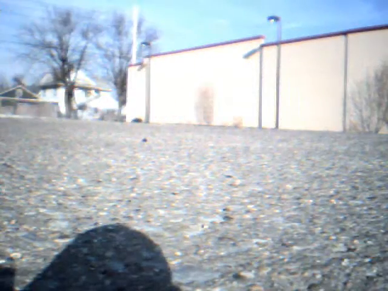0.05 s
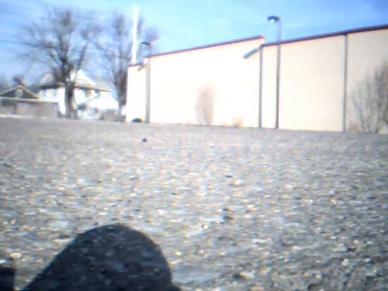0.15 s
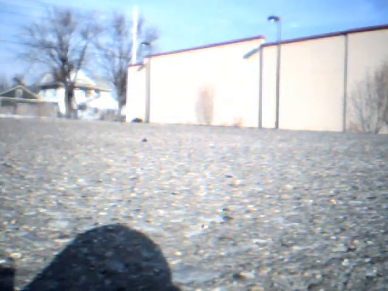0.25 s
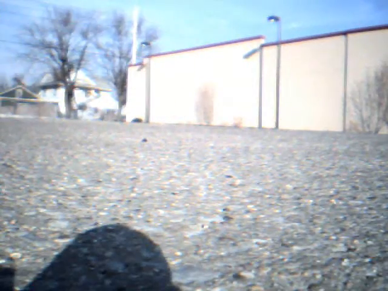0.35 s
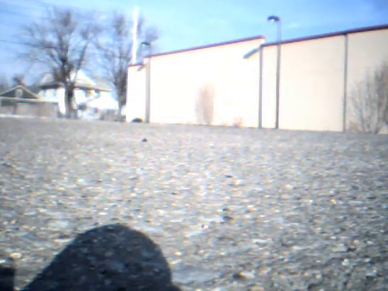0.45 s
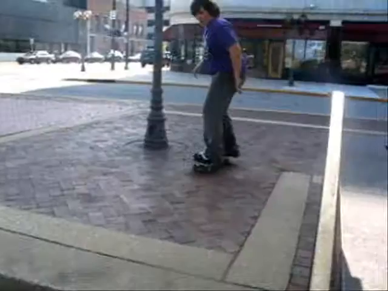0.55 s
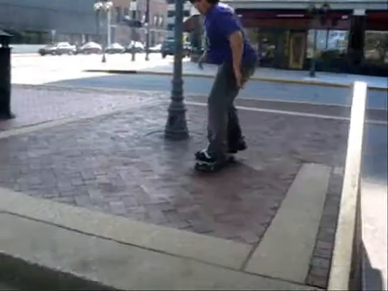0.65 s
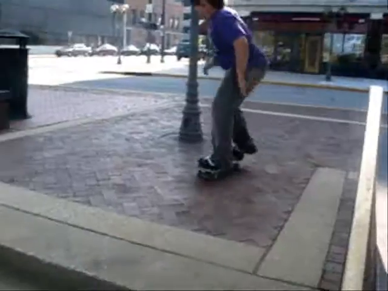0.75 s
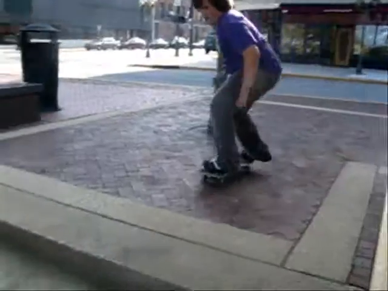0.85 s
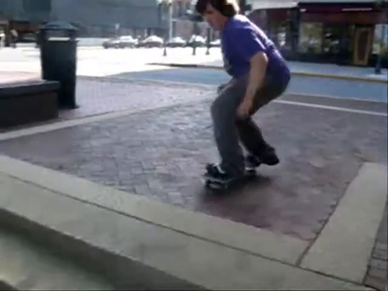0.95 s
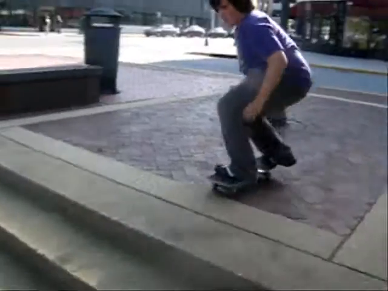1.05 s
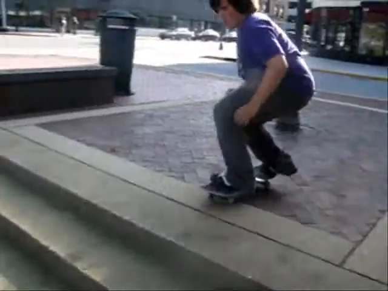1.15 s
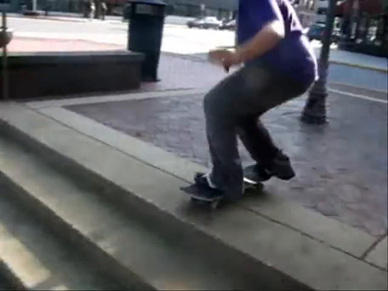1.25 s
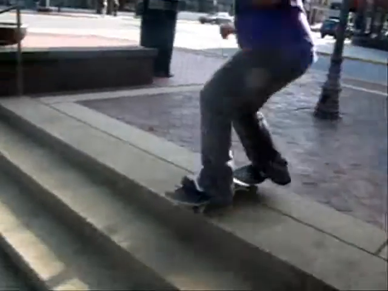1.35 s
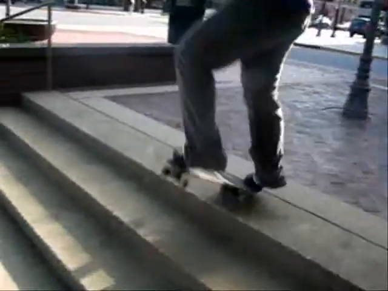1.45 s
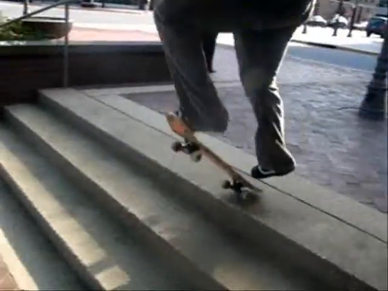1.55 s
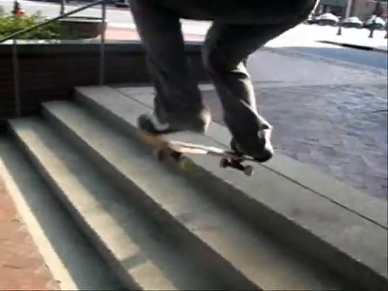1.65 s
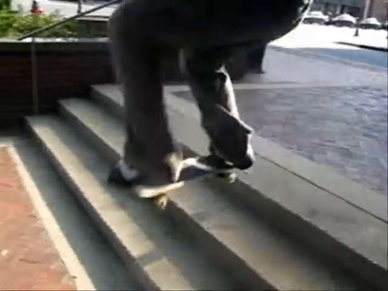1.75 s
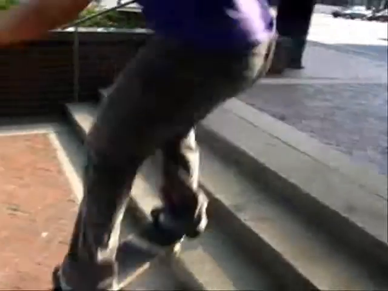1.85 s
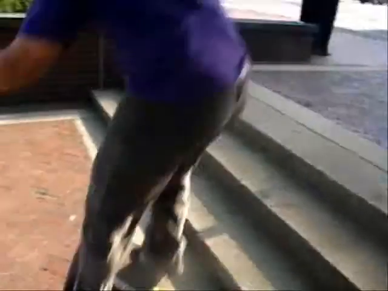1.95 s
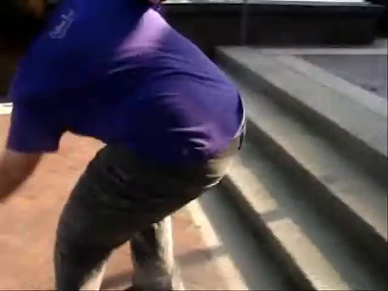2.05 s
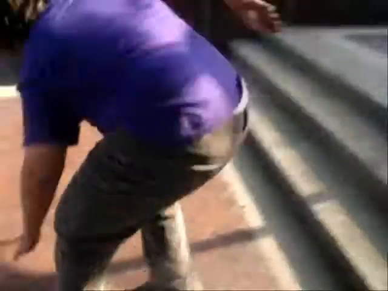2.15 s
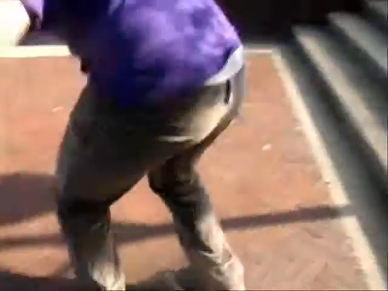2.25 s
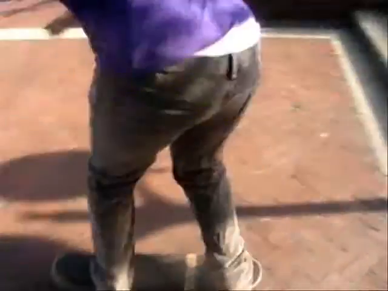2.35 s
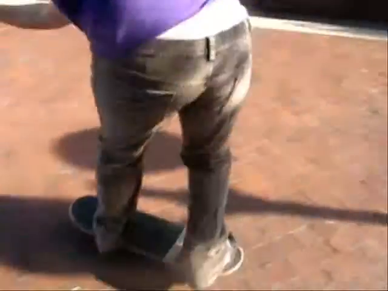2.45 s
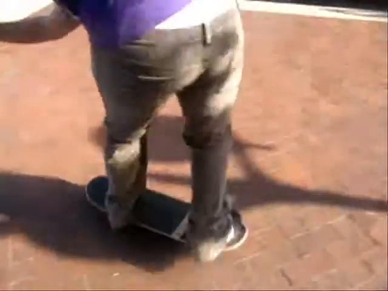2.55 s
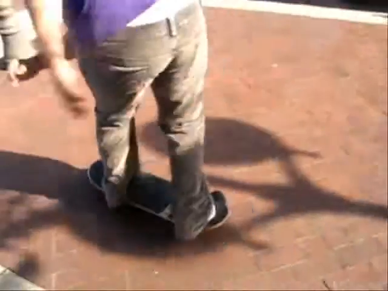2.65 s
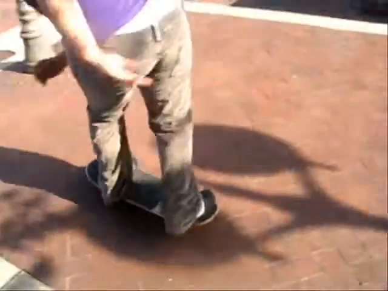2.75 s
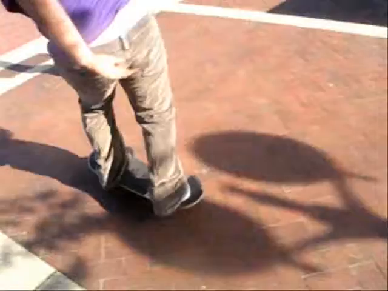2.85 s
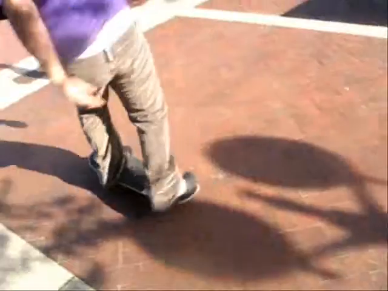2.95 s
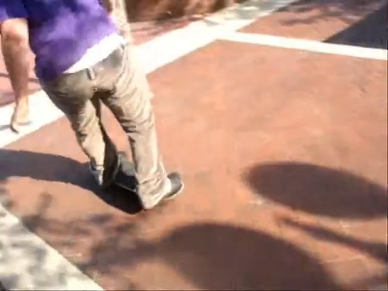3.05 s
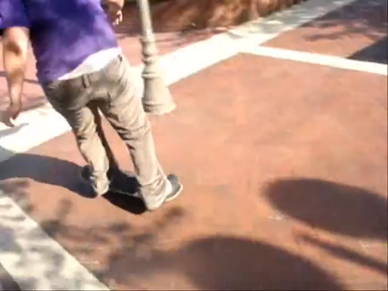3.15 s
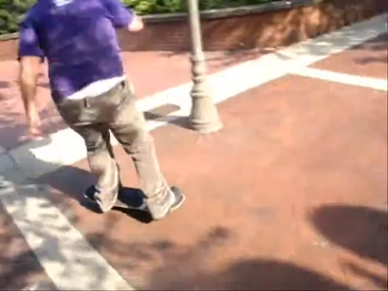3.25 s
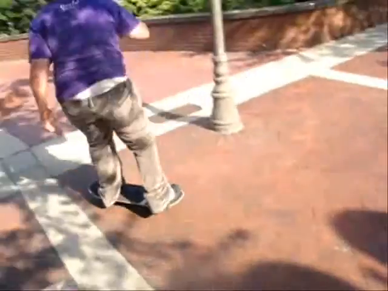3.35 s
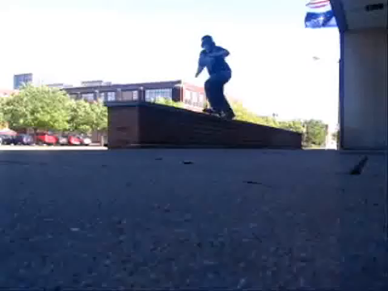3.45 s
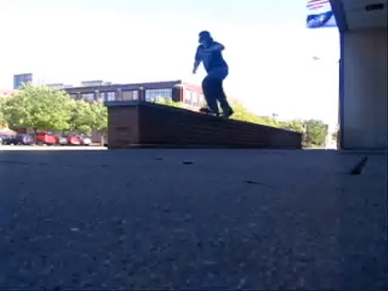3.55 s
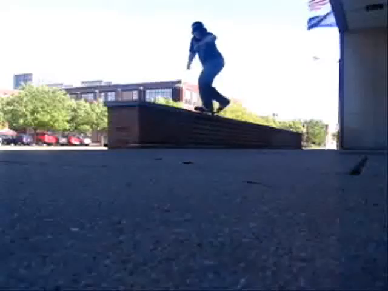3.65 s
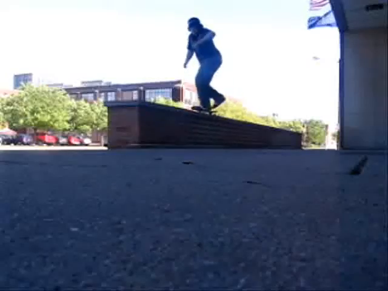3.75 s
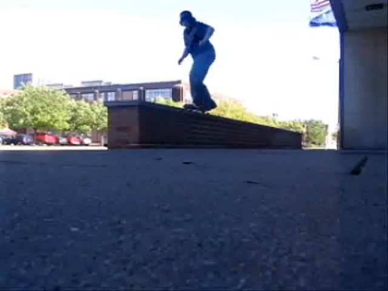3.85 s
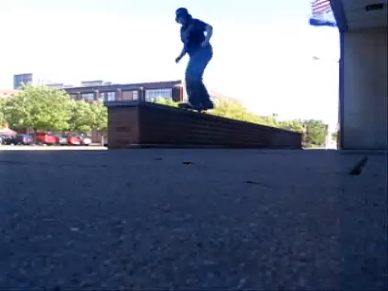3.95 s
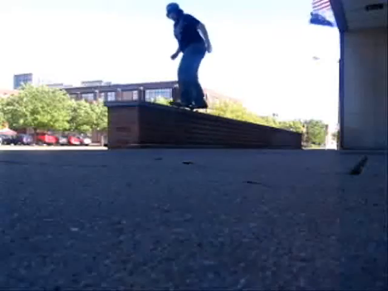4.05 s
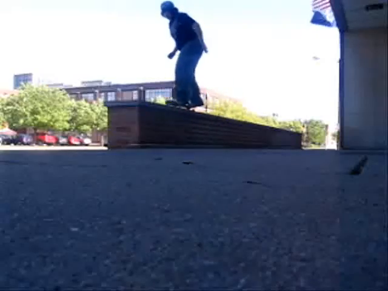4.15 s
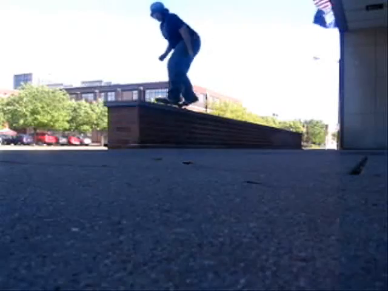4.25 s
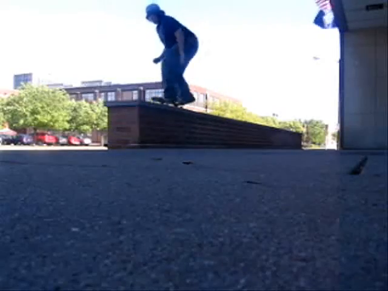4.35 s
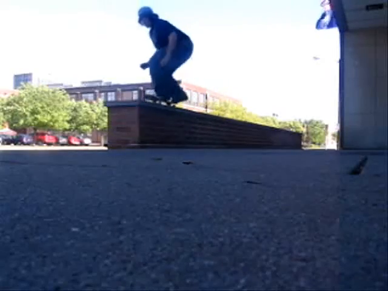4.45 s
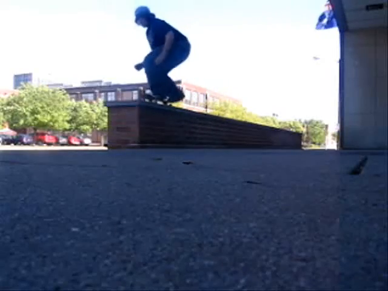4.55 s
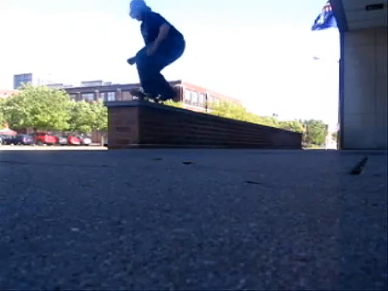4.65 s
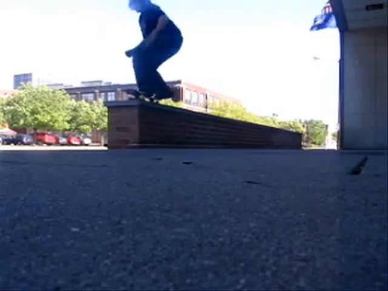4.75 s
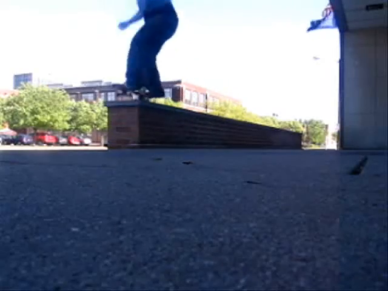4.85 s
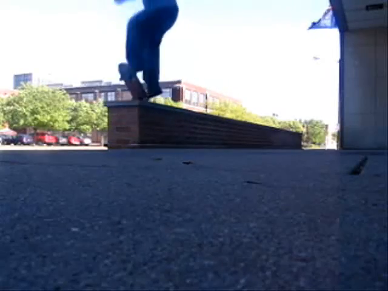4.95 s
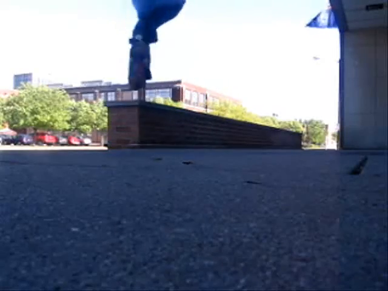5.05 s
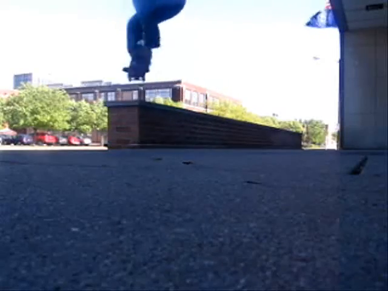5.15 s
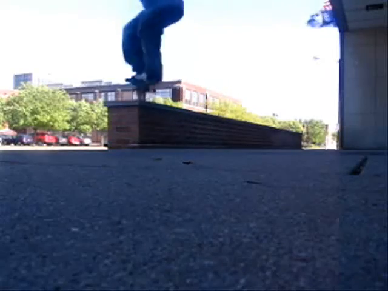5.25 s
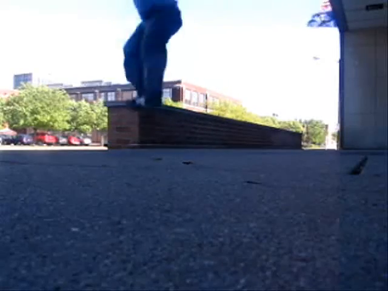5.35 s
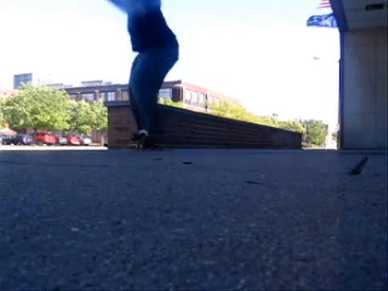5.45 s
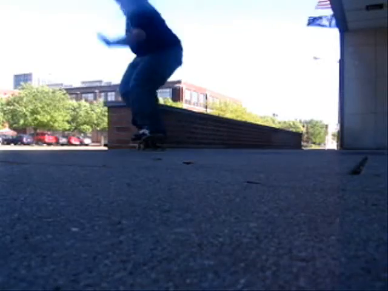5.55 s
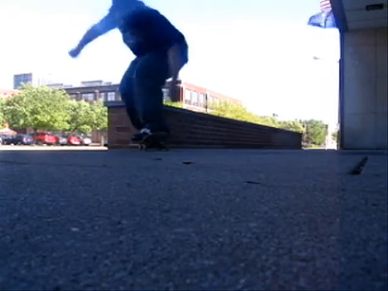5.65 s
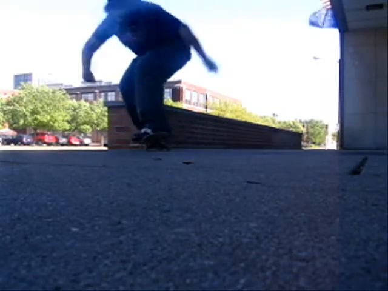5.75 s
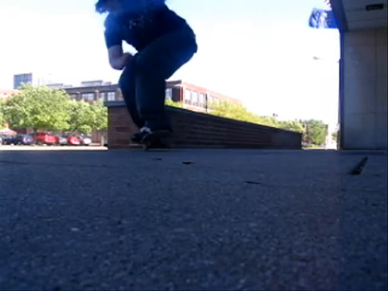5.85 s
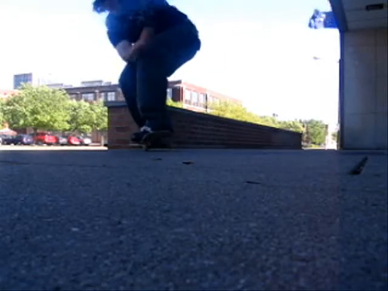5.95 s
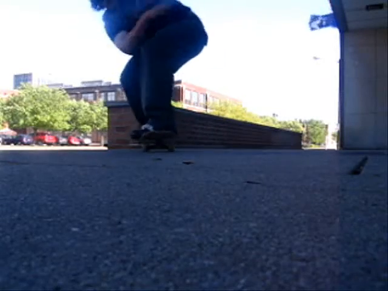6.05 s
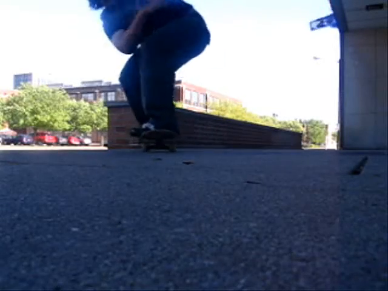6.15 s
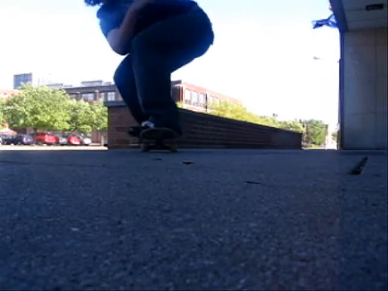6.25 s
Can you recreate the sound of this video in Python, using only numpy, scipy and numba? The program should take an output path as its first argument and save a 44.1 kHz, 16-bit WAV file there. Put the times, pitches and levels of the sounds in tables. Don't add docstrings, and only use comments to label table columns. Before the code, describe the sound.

Total silence until about 0.65 s, then an abrupt start: hard skateboard wheels rattle close over paving bricks, with quick woody knocks and metallic truck clacks. At 1.37 s the tail pops sharply; the rolling thins as the board drops down steps, with cracks at 1.5 and 1.65 s. A very loud landing slams at 2.08 s, followed by scattered clacks, another hard knock at 2.49 s, and rougher, louder rolling until 3.4 s. After a small crack, the scene cuts at 3.51 s to a second board rumbling along a brick ledge with dull bumps, a sharp knock at 4.36 s and a pop at 5.09 s. A quieter airborne gap has faint clicks; a heavy multiple slam hits asphalt at 5.53 s, then gritty rolling continues, with a crack at 6.09 s, to the end. Faint traffic, wind puffs and slight wall slap; clipped, coarse, gain-pumping microphone with grainy metallic treble.

```python
import sys
import numpy as np
from scipy import signal
from scipy.io import wavfile
from scipy.ndimage import uniform_filter1d
from numba import njit

SR = 44100
rng = np.random.default_rng(int(sys.argv[2]) if len(sys.argv) > 2 else 0)


def natural_amplitude(level_db):
    exponent = np.asarray(level_db, float) / 20
    return 10 ** exponent


def materialize(psi):
    bounded = np.clip(np.atleast_2d(psi).T, -1, 1)
    quanta = np.round(bounded * 32767).astype(np.int16)
    wavfile.write(sys.argv[1], SR, quanta)


N = 277908

START_S, CUT_S, LAND_S = 0.6465, 3.51, 5.53

# pitch_hz, density_db (per Hz)
TRAFFIC_SPECTRUM = [(41, -32), (70, -7.5), (260, -18), (1170, -12.5), (1460, -2.5), (1880, -16),
                    (3200, -35.5), (5400, -50)]
# pitch_hz, width_hz, level_db
BRICK_MODES = [
    [(125.6, 57, -0.5), (232, 32, 0.5), (302, 90, -4.5)],
    [(459, 194, -4), (700, 86, 1), (1020, 273, -6)],
    [(1314, 150, 13), (2050, 630, 6.5), (2880, 420, 8), (4640, 4300, -7.5)],
]
LEDGE_MODES = [
    [(152.5, 30, -1.4), (231, 48, -2), (351, 96, -0.45)],
    [(435, 103, 3), (716, 140, 2), (986, 370, -4.5)],
    [(1300, 210, 12), (1850, 465, 7), (2530, 1200, -0.5), (5380, 2500, -10.5)],
]
ASPHALT_MODES = [
    [(180, 23, -5), (250, 130, -6), (337, 48, 2)],
    [(452, 224, -1.5), (682, 183, 1), (920, 390, -5)],
    [(1390, 350, 7), (1780, 560, 3), (2700, 370, 0), (5100, 3200, -14)],
]
# low_hz, high_hz
RADIATION_BANDS = [(110, 445), (300, 1370), (1100, 8400)]
# time_s, load_db
PLAZA_LOAD = [
    [(0.67, -17.5), (0.752, -18), (0.788, -16.5), (0.936, -20.5), (1.08, -20), (1.174, -19), (1.2, -17),
     (1.36, -19)],
    [(1.378, -36), (1.5, -22), (1.54, -33.5), (1.64, -30), (1.68, -29), (1.768, -41), (1.80, -31),
     (1.964, -26), (2.065, -25)],
    [(2.115, -31), (2.149, -28.5), (2.191, -25.5), (2.349, -30.5), (2.473, -19.5), (2.501, -25.5),
     (2.53, -27)],
    [(2.545, -33.5), (2.643, -28.5), (2.757, -25), (2.861, -23.5), (2.963, -20.5), (3.007, -24),
     (3.149, -18), (3.271, -21), (3.32, -20.5)],
    [(3.34, -28), (3.389, -34), (3.465, -27.5), (3.49, -31.5)],
]
LOT_LOAD = [
    [(3.512, -24.5), (3.756, -16), (3.806, -21), (3.868, -23), (3.934, -13), (4.005, -14.5), (4.076, -25),
     (4.284, -23), (4.345, -16.5)],
    [(4.4, -21), (4.442, -20.5), (4.558, -22.5), (4.59, -19.5), (4.631, -21.5), (4.853, -16), (4.929, -14),
     (5.065, -20.5), (5.095, -21)],
    [(5.112, -27.5), (5.15, -35), (5.218, -39), (5.33, -33.5), (5.454, -35.5), (5.515, -27.5)],
    [(5.6, -16), (5.66, -19), (5.734, -20.5), (5.922, -22.5), (6.072, -16.5), (6.115, -15.5), (6.155, -17),
     (6.233, -18.5), (6.29, -18)],
]
# boom_db, rattle_db, wind_db, slope (rattle dB per dB of load)
RIDE_SHARES = [(-3.5, -7.5, -34, 0.93), (-2.5, -2, -41, 0.95), (-3.5, -6.5, -41, 1.4), (-4, -7, -38.5, 2),
               (-.5, -17, -42, 0.2), (-1, -9.5, -33.5, 0.89), (-4.5, -11.5, -34, 1.46),
               (-7.5, -7.5, -48, 1.7), (-9, -12.5, -44, 1.35)]
# time_s, peak_db
GUSTS = [(.68, -30), (.77, -36), (1.17, -28), (2.05, -29), (3.15, -24), (3.32, -37), (3.6, -29),
         (3.85, -32), (4.88, -29), (5.03, -31), (6.085, -33), (6.2, -34), (6.29, -30)]
# ratio (to deck pitch), level_db, width_hz
DECK_OVERTONES = [(0.964, 3.5, 125), (1.303, -7.5, 273), (0.66, -5.5, 240)]
# ratio (to truck pitch), level_db, width_hz
TRUCK_OVERTONES = [(1.044, 1.5, 360), (0.58, -4, 620), (1.39, 0, 340), (3.05, -22.5, 1700)]
# start_s, peak_db, crack_db, deck_hz
JOINTS = [(.653, -7, -10, 457), (.695, -8, -8, 654), (.793, -7, -4, 487), (0.987, -9.5, -12, 460),
          (1.021, -8.5, -8, 457), (1.067, -10.5, -13, 765), (1.146, -10, -32, 460), (1.254, -7.5, -13, 720),
          (1.413, -14, -22, 540), (1.443, -12.5, -26, 480), (2.192, -9.5, -14, 1020),
          (2.236, -10, -13, 690), (2.257, -13.5, -24, 1050), (2.29, -18, -22, 300), (2.511, -9.5, -16, 605),
          (2.647, -13, -26, 580), (2.664, -13.5, -20, 493), (2.734, -16.5, -18, 694),
          (2.864, -6.5, -26, 650), (2.875, -7.5, -23, 584), (3.037, -8.5, -23, 690), (3.164, -5, -23, 325),
          (3.19, -10, -9, 765)]
# start_s, peak_db, crack_db, truck_hz
CLACKS = [(.828, -12, -1, 1990), (.867, -9, -6, 1940), (.912, -8, -6, 1690), (1.203, -21, -11, 2060),
          (1.624, -20, 0.5, 3160), (2.082, -4, 2.5, 2830), (2.282, -20, 4, 2700), (2.33, -17.5, 0, 1930),
          (2.38, -14, 4, 2900), (2.388, -12.5, -.5, 2050), (2.421, -12, -9, 3220), (2.443, -13, -1, 1960),
          (2.466, -7, -10, 1950), (2.944, -10.5, -3, 2310), (2.991, -4.5, -5, 2800),
          (3.059, -6, -4.5, 2640), (3.09, -9.5, -7, 2700), (3.134, -5.5, -20, 2700),
          (3.214, -8.5, -1, 2200), (3.258, -24, 10.5, 1870), (3.294, -18.5, 12, 1980),
          (3.327, -9.5, 6, 2210), (5.248, -32, 11, 1750), (5.42, -30.5, 4, 1880)]
# start_s, peak_db, crack_db, deck_hz, t60_s
SLAMS = [(1.363, -2.5, -2.5, 700, 0.041), (1.371, -5.5, -14, 680, .025), (1.495, -9.5, -10, 686, 0.13),
         (1.509, -7, 3, 1110, 0.039), (1.651, -6, 2.5, 820, 0.037), (1.801, -17.5, 4, 920, .05),
         (2.073, 5.5, -10, 882, 0.063), (2.095, -3, -21, 850, 0.044), (2.492, -4, -5.5, 656, 0.06),
         (3.475, -8, 2.5, 1100, 0.019), (4.356, -5.5, -12, 567, 0.2), (5.088, -11, -4, 1020, 0.11),
         (5.103, -11.5, 7.5, 1010, 0.032), (5.302, -19.5, -6, 990, 0.084), (5.324, -21, -10, 1000, 0.055),
         (5.522, -15, -20, 890, 0.061), (5.531, -2.5, -5.5, 930, 0.086), (5.543, -0.5, -1, 480, 0.045),
         (5.552, 0.5, -27, 884, .11), (5.574, -3, -15.5, 870, .07), (5.598, -12.5, -9, 800, 0.14),
         (6.093, -11, 2.5, 830, 0.027)]
# start_s, peak_db, deck_hz
BUMPS = [(3.514, -18, 1010), (3.756, -9.5, 584), (3.776, -8.5, 620), (3.909, -22, 450), (4.0, -9, 290),
         (4.119, -11.5, 450), (4.377, -4.5, 570), (4.588, -6, 500), (4.609, -11.5, 547), (4.921, -12, 654),
         (4.954, -7.5, 520), (5.865, -12, 604), (6.182, -8.5, 586), (6.205, -9.5, 700), (6.228, -9, 630)]
# start_s, length_s, level_db, pitch_hz
FLEXES = [(0.678, .12, -20, 201), (1.002, 0.36, -26.5, 110.3), (1.204, .05, -20, 150),
          (1.844, 0.19, -30, 138), (2.802, .18, -25.5, 129.5), (3.046, 0.097, -22, 128.5),
          (3.278, 0.052, -23, 132), (4.78, 0.16, -24.5, 151), (6.143, 0.086, -24, 180),
          (3.638, .05, -16, 153), (3.759, 0.028, -16, 145), (3.918, 0.046, -12.5, 151)]
# start_s, peak_db
TICKS = [(.7944, -24), (.8275, -19), (1.068, -34), (1.2077, -24), (1.2271, -25), (1.257, -25), (1.365, -15),
         (1.652, -14), (2.1138, -16), (2.2383, -17), (2.3044, -19), (2.3235, -16), (2.3466, -18),
         (2.361, -19), (3.142, -12), (3.951, -21), (4.356, -8), (4.8844, -14), (5.5299, -2.5),
         (5.8217, -25), (6.094, -15)]


def level(x, db):
    return x * natural_amplitude(db) / np.sqrt(np.mean(x ** 2))


@njit
def svf(x, hz, width):
    y, b, l = np.empty(len(x)), 0., 0.
    g, k = np.tan(np.pi * hz / SR), width / hz
    for i in range(len(x)):
        v = (b + g * (x[i] - l)) / (1 + g * (g + k))
        b, l, y[i] = 2 * v - b, l + 2 * g * v, k * v
    return y


def ring(force, modes):
    out = 0
    for k, (hz, width, db) in enumerate(modes):
        out = out + (-1) ** k * natural_amplitude(db) * svf(force, 1. * hz, 1. * width)
    return out


def walk(rate):
    k = int(SR / rate)
    held = np.repeat(rng.standard_normal(N // k + 1), k)
    return 1.4 * uniform_filter1d(uniform_filter1d(held, k), k)[:N]


def town():
    hz_at, db_at = np.transpose(TRAFFIC_SPECTRUM)
    out = 0
    for hz in 80 * 2 ** np.arange(0, 6.2, .5):
        db = np.interp(np.log(hz), np.log(hz_at), db_at) + 2.5 * walk(5.9)
        out = out + natural_amplitude(db) * svf(rng.standard_normal(N), hz, hz / 3)
    plaza_db, lot_db = -5, -4
    return level(out, -31) * natural_amplitude(np.where(np.arange(N) < CUT_S * SR, plaza_db, lot_db))


def grit(rate, spread_db):
    kick = rng.random(N) < rate / SR
    return kick * rng.standard_normal(N) * natural_amplitude(spread_db * rng.exponential(size=N))


def jingle():
    return level(sum(svf(grit(90, 0.57), hz, hz / 18) for hz in np.geomspace(1700, 4300, num=9)), 0)


def ride_curves():
    curves = PLAZA_LOAD + LOT_LOAD
    s, load = np.concatenate(curves).T
    shares = np.repeat(RIDE_SHARES, [len(c) for c in curves], axis=0).T
    return s, load, shares


def rolling():
    t = np.arange(N) / SR
    s, load, (boom, rattle, _, slope) = ride_curves()
    usual_db = -22
    motion_db = [load + boom, load, usual_db + rattle + slope * (load - usual_db)]
    ground = (t > CUT_S).astype(int) + (t > LAND_S)
    load_db = 0.73 * walk(45)
    coarse, fine = level(grit(2000, 1.5), 0), level(grit(6000, 1.14), 0)
    out = 0
    for k, (share, own_db) in enumerate([(0.92, 0.98), (0.41, 0.54), (0.38, 0.55)]):
        kicks = share * coarse + (1 - share) * fine
        kicks = signal.sosfilt(signal.butter(2, RADIATION_BANDS[k], "band", fs=SR, output="sos"), kicks)
        bodies = [level(ring(kicks, modes[k]), 0) for modes in (BRICK_MODES, LEDGE_MODES, ASPHALT_MODES)]
        body = np.choose(ground, bodies)
        if k == 2:
            body = body + natural_amplitude(np.where(ground, -16, -9.5)) * jingle()
        out = out + body * natural_amplitude(np.interp(t, s, motion_db[k]) + load_db + own_db * walk(14))
    return out


def wind():
    t = np.arange(N) / SR
    s, _, (_, _, wind_db, _) = ride_curves()
    rumble = svf(svf(rng.standard_normal(N), 45., 67.), 59., 110.)
    gust_s = .04
    puffs = sum(natural_amplitude(db) * np.exp(-np.abs(t - at) / gust_s) for at, db in GUSTS)
    return level(rumble, 0) * (natural_amplitude(np.interp(t, s, wind_db)) + puffs) * natural_amplitude(1.9 * walk(15))


def truck_pitch(deck_hz):
    return 1420 + 0.81 * deck_hz


def strikes():
    joints = [(s, p, c, hz, truck_pitch(hz), 0.052) for s, p, c, hz in JOINTS]
    clacks = [(s, p, c, 680, hz, 0.034) for s, p, c, hz in CLACKS]
    slams = [(s, p, c, hz, truck_pitch(hz), t60) for s, p, c, hz, t60 in SLAMS]
    bumps = [(s, p, -24, hz, truck_pitch(hz), 0.081) for s, p, hz in BUMPS]
    return joints + clacks + slams + bumps


def blows():
    out, n = np.zeros(N + SR), SR // 6
    t = np.arange(n) / SR
    first = 1 + 4.6 * np.exp(-t / 0.00046)
    for s, peak_db, crack_db, deck_hz, truck_hz, t60 in strikes():
        fade = np.log(1000) * (t / np.clip(t60, .01, .4)) ** 1.76
        chatter = rng.standard_normal((3, n)) * np.minimum(t / 0.00081, 1)
        deck_modes = [(deck_hz * r, w, db) for r, db, w in DECK_OVERTONES]
        deck = ring(chatter[0] * np.exp(-2.6 * fade), deck_modes)
        truck_modes = [(truck_hz * r, w, db) for r, db, w in TRUCK_OVERTONES]
        crack = ring(chatter[1] * first * np.exp(-np.sqrt(1.65 * fade) * 1.08), truck_modes)
        thud = svf(chatter[2] * np.exp(-1.5 * fade), 234., 160.)
        i = int(s * SR)
        for part, db in [(deck, 0), (crack, crack_db), (thud, -15.5)]:
            out[i:i + n] += part / np.abs(part).max() * natural_amplitude(peak_db + db)
    return out[:N]


def flex():
    t = np.arange(N) / SR
    width_hz, rise_db_per_s = 9.6, 266
    out = 0
    for s, length, db, hz in FLEXES:
        drone = level(svf(rng.standard_normal(N), 1. * hz, width_hz), -2.8)
        away = np.maximum(np.maximum(s - t, t - s - length), 0)
        out = out + drone * natural_amplitude(np.maximum(db - rise_db_per_s * away, -120))
    return svf(out, 145., 150.)


def ticks():
    out, t = np.zeros(N + SR), np.arange(SR // 20) / SR
    t60_s = 0.0084
    for s, peak_db in TICKS:
        burst = rng.standard_normal(len(t)) * np.exp(-np.log(1000) * t / t60_s)
        click = svf(burst, 5420., 1500.)
        out[int(s * SR):][:len(t)] += click / np.abs(click).max() * natural_amplitude(peak_db)
    return out[:N]


def walls(hits):
    t = np.arange(SR // 3) / SR
    t60_s = 0.26
    echo = level(rng.standard_normal(len(t)) * np.exp(-np.log(1000) * t / t60_s) * (t > .012), -54.5)
    return svf(signal.fftconvolve(hits, echo)[:N], 1000., 2500.)


def scene():
    street = town() + rolling() + wind()
    hits = blows() + ticks()
    return (street + hits + flex() + walls(hits))[None]


def roll_off(x):
    return signal.sosfilt(signal.butter(12, 16090, fs=SR, output="sos"), x)


def record(dry):
    x = signal.sosfilt(signal.butter(1, 6500, fs=SR, output="sos"), dry[0])
    offset, sink_db, sink_s = 0.076, -17, 0.77
    fall = np.exp(-1 / (sink_s * SR))
    loud = signal.lfilter([1 - fall], [1, -fall], np.abs(x))
    x = x + offset / (1 + (loud / natural_amplitude(sink_db)) ** 2)
    ceiling, steps, hold = .63, 256, 4
    x = x / (1 + (x / ceiling) ** 12) ** (1 / 12)
    x = np.round(x[::hold] * steps / ceiling) * ceiling / steps
    x = np.repeat(x, hold)[:N]
    x = x * (np.arange(N) > START_S * SR)
    x = signal.sosfilt(signal.ellip(10, .2, 80, 15550, fs=SR, output="sos"), x)
    return roll_off(x[None])


dry = scene()
out = record(dry)
materialize(out)
```